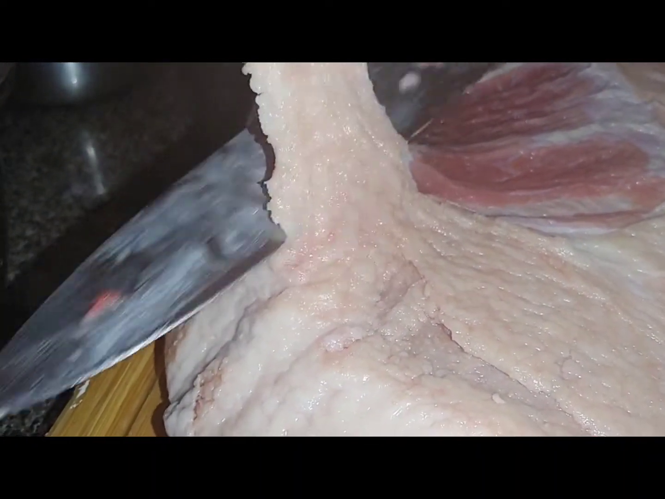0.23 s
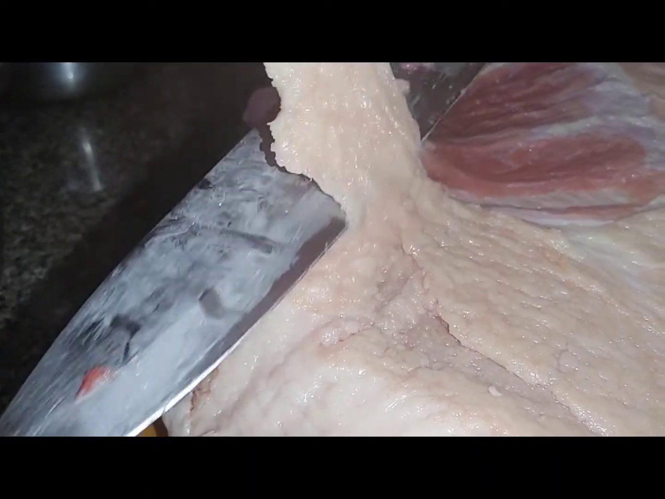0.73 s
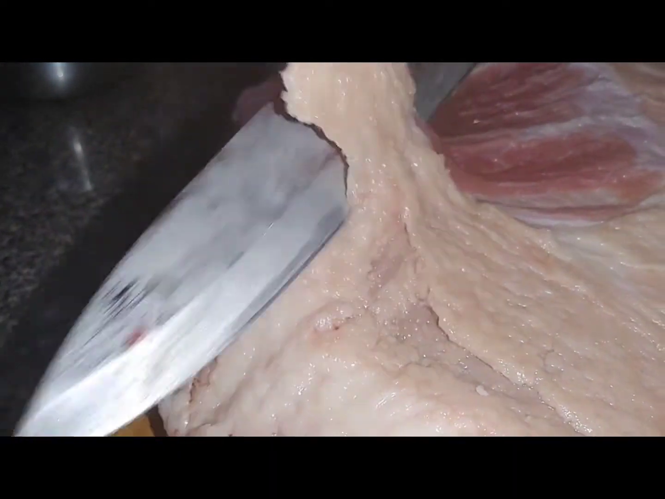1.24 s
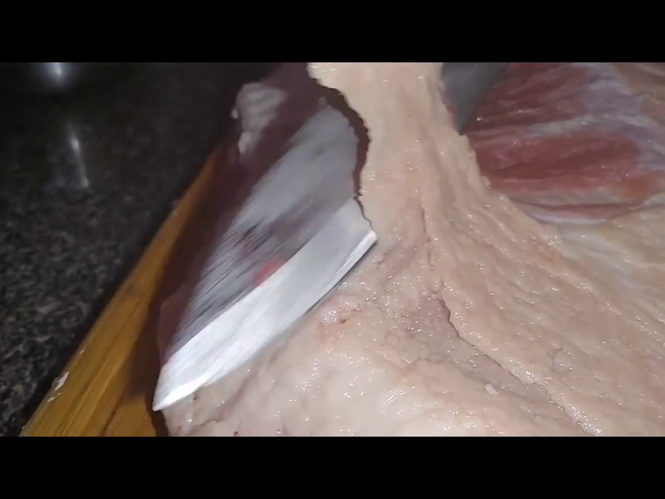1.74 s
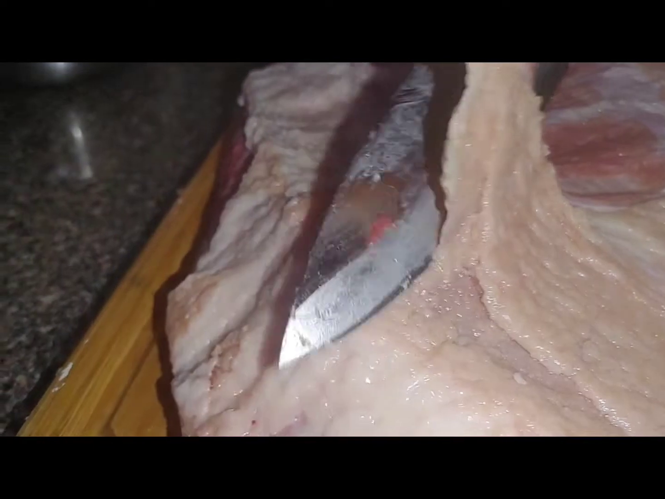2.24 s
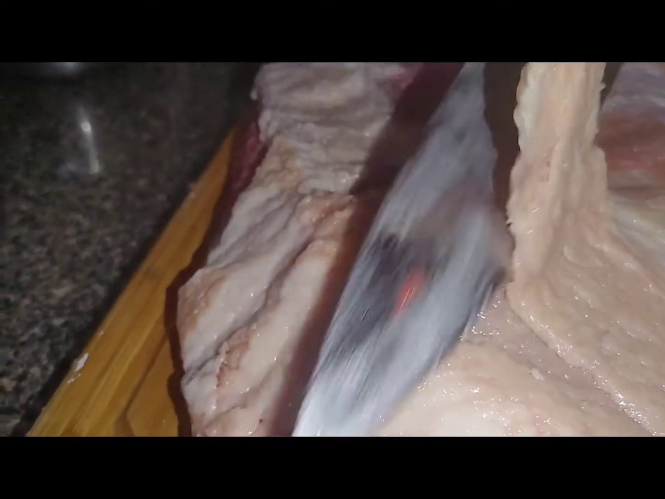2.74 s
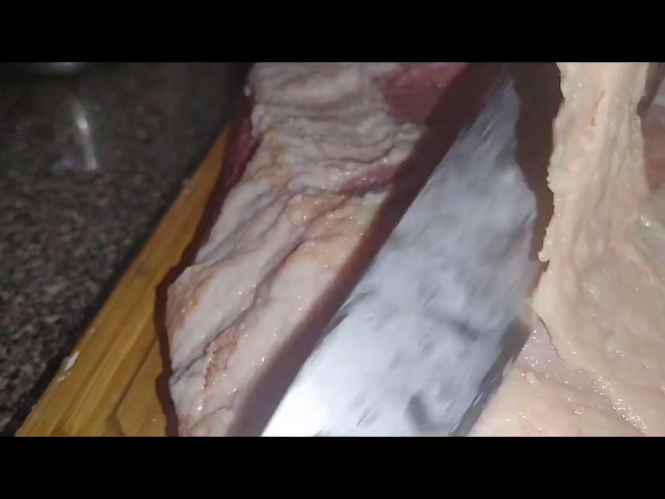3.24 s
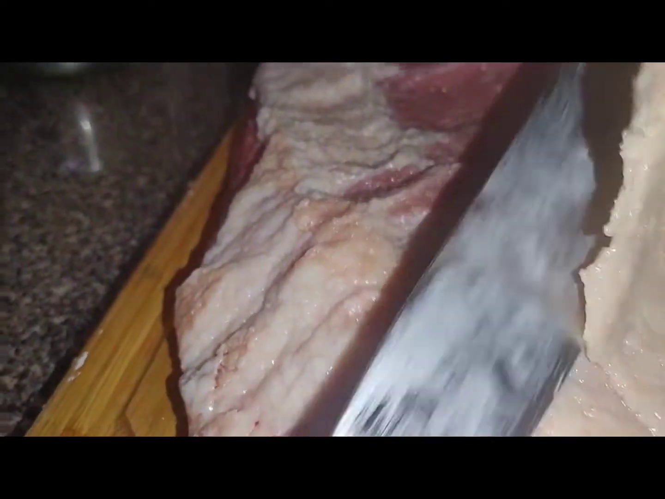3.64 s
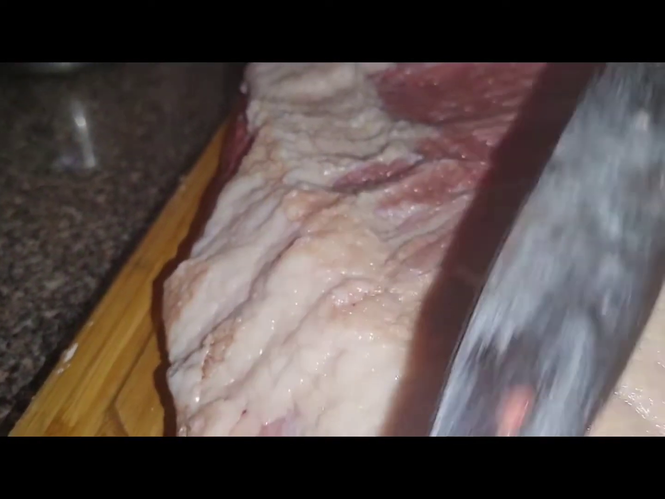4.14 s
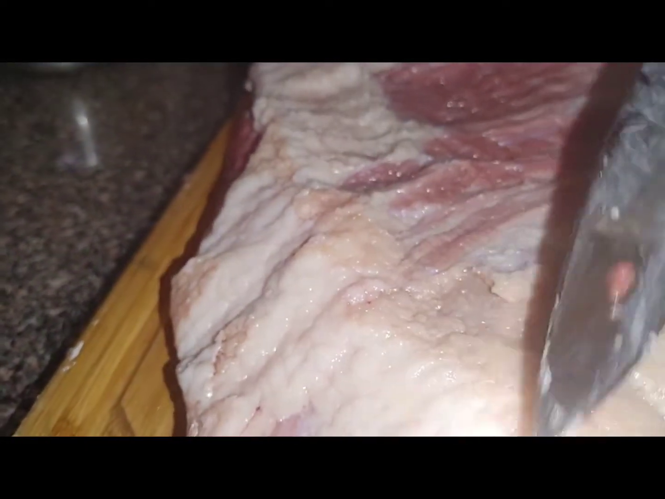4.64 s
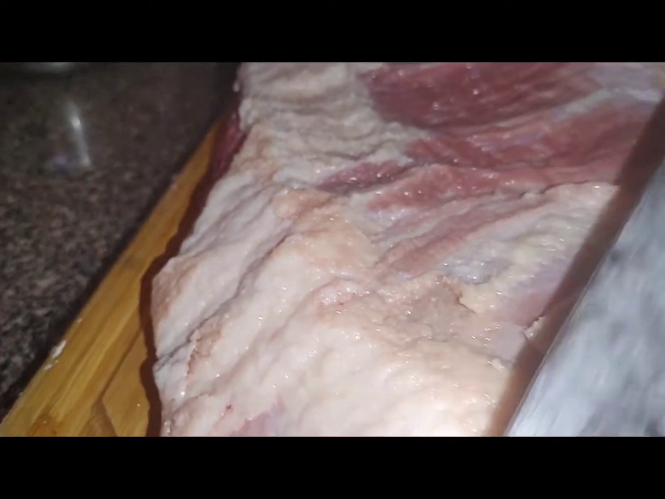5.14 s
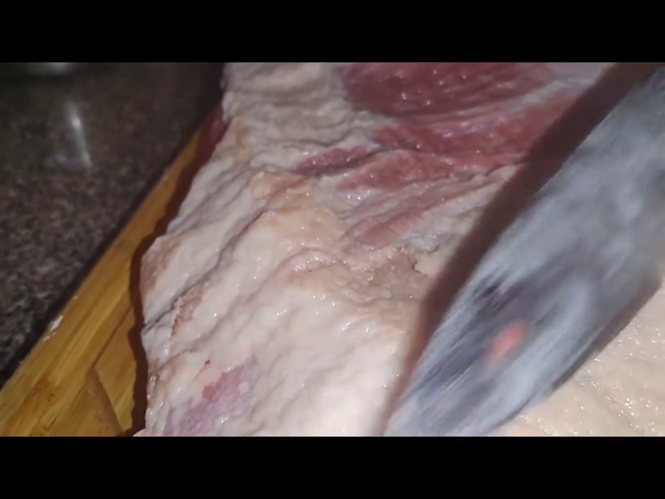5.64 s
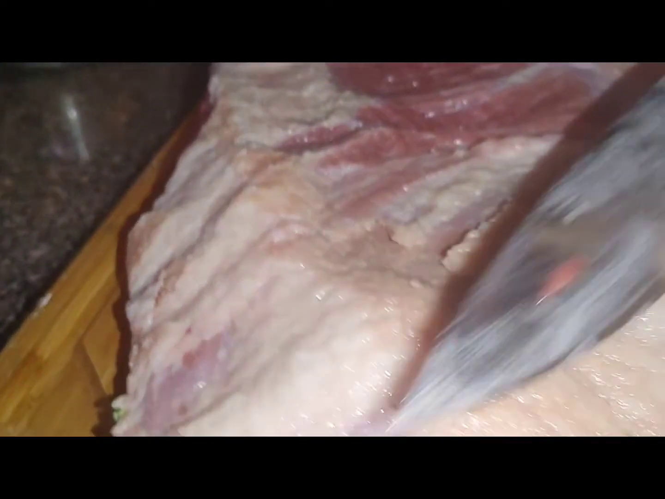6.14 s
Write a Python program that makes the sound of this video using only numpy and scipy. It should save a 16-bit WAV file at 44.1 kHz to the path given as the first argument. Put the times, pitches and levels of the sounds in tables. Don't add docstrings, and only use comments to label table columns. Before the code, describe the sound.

Close, quick to-and-fro knife sawing through cold fat, bright metallic hiss about five strokes a second, small blade knocks and scuffs, faint fridge hum.

```python
import sys
import numpy as np
from scipy import signal
from scipy.fft import rfft, irfft
from scipy.io import wavfile
from scipy.ndimage import uniform_filter1d

SR = 44100
rng = np.random.default_rng(int(sys.argv[2]) if len(sys.argv) > 2 else 0)


def boost_factor(decibels):
    exponent = np.asarray(decibels, float) / 20
    return 10 ** exponent


def waveform_to_disk(signal):
    frames = np.transpose(np.atleast_2d(signal))
    scaled = np.clip(frames, -1, 1) * 32767
    samples = np.round(scaled).astype(np.int16)
    wavfile.write(sys.argv[1], SR, samples)


N = 281799

BLADE_MODES_HZ = [1530, 2345, 2760, 3590, 4250, 4820, 5500, 6558, 7120, 7552, 8200, 8495, 9395, 10150,
                  10330, 10960, 11310, 11950, 13000, 14020, 14500, 15100]


def rms_one(x):
    return x / np.sqrt(np.mean(x ** 2) + 1e-20)


def at_hz(points, hz):
    points_hz, values = np.transpose(points)
    return np.interp(np.log(hz), np.log(points_hz), values)


def drift(rate_hz):
    r = np.exp(-80 * np.pi * rate_hz / SR)
    noise = rng.standard_normal(N // 40 + 2002)
    slow = signal.lfilter([1], [1, -2 * r, r * r], noise)[2000:]
    return np.interp(np.arange(N) / 40, np.arange(len(slow)), rms_one(slow))


def resonate(x, hz, width_hz):
    r = np.exp(-np.pi * width_hz / SR)
    poles = [1, -2 * r * np.cos(2 * np.pi * hz / SR), r * r]
    return signal.lfilter([(1 - r * r) / 2, 0, (r * r - 1) / 2], poles, x)


def pair(one, other, alike):
    alike = np.clip(alike, 0, 1)
    return np.sqrt(1 + alike) * one + np.sqrt(1 - alike) * other * [[1], [-1]]


def sides(lean_db):
    return boost_factor(lean_db * np.array([[.5], [-.5]]))


def room_tone():
    # (frequency [Hz], density [dB per Hz])
    floor_spectrum = [(12, -56), (20, -37), (122, -6.5), (196, 0.5), (362, -0.5), (465, -11.5), (614, -8.5),
                      (1820, -22), (2760, -21.5), (3360, -23), (4960, -31.5), (5860, -32), (8410, -48),
                      (11700, -52), (15500, -65)]
    # (frequency [Hz], left-right likeness [0-1])
    likeness = [(40, 0.19), (300, 1), (600, 0.31), (1500, 0.04), (6000, .05)]
    hz = np.arange(N // 2 + 1) * SR / N + 1
    one, other = rfft(rng.standard_normal((2, N))) * boost_factor(at_hz(floor_spectrum, hz))
    return boost_factor(-65) * rms_one(irfft(pair(one, other, at_hz(likeness, hz)), N))


def motor():
    # (frequency [Hz], width [Hz], rms level [dB], steady power share [0-1])
    hum_lines = [(53, 5.2, -84, 0.34), (75, 20, -83.5, 0.061), (185.3, 13, -71, 0.26),
                 (199.4, 4.6, -63, 0.65), (250.7, 12.5, -73, 0.19), (293, 19, -72, 0.037),
                 (399.4, 4.4, -79, 0.086), (441, 15, -82, 0.034), (473, 23.5, -80, 0.084),
                 (743, 12, -89.5, 0.17)]
    out, t = 0, np.arange(N) / SR
    for hz, width_hz, db, steady in hum_lines:
        sine = np.sin(2 * np.pi * hz * t + 6 * rng.random())
        waver = rms_one(resonate(rng.standard_normal(N), hz, width_hz))
        out = out + boost_factor(db) * (np.sqrt(2 * steady) * sine + np.sqrt(1 - steady) * waver)
    return boost_factor(3.5) * out


def kitchen(x, t60_s=0.28, wet_db=-20, dull_t60_s=0.33, dull_db=-3, dull_hz=5000):
    t = np.arange(int(.4 * SR)) / SR
    bright, dull = rng.standard_normal((2, 2, len(t))) * (t > .004)
    dull = signal.sosfilt(signal.butter(2, dull_hz, fs=SR, output="sos"), dull)
    tail = bright * boost_factor(-60 * t / t60_s) + dull * boost_factor(dull_db - 60 * t / dull_t60_s)
    tail = tail / np.sqrt(np.sum(tail ** 2) / 2)
    return boost_factor(wet_db) * signal.fftconvolve(x, tail, axes=1)[:, :N]


def taps():
    # (time [s], peak level [dB], ring [Hz], thump [dB])
    knocks = [
        (1.684, -53.5, 1425, -2),
        (3.445, -47.5, 1160, -0.5),
        (3.697, -46, 1530, -8),
        (4.052, -56.5, 1700, 2),
        (5.932, -51.5, 1560, -22),
    ]
    out, t = np.zeros(N), np.arange(2000) / SR
    swell = np.exp(-t / .005) * (1 - np.exp(-t / .0015)) * 1.9
    for s, db, hz, thump_db in knocks:
        thump = resonate(rng.standard_normal(len(t)), 490, 640) * np.exp(-t / 0.025)
        ring = np.sin(2 * np.pi * hz * t * (0.924 + 6.2 * t)) * swell
        i = round(s * SR)
        out[i:i + len(t)] += boost_factor(db) * (ring + boost_factor(thump_db + 6.5) * thump)
    return out * boost_factor(np.array([[-5], [4]]))


def catches():
    # (start [s], length [s], ring near 4 kHz [dB], ring near 2 kHz [dB])
    scuffs = [
        (4.809, 0.018, -48.5, -60),
        (4.983, 0.035, -50.5, -56),
        (5.556, 0.022, -45.5, -81),
        (5.703, 0.068, -49, -50.5),
        (5.752, 0.019, -39.5, -61),
        (5.876, 0.0043, -50.5, -74),
        (1.154, 0.01, -54.5, -70),
        (4.633, 0.019, -56, -74),
    ]
    out = np.zeros((2, N))
    for s, length_s, high_db, low_db in scuffs:
        t = np.arange(int(length_s * SR) + 1500) / SR
        swell = np.sqrt(np.sin(np.pi * np.minimum(t / length_s, 1)) + 1e-12)
        scuff = rng.standard_normal((2, len(t))) * swell
        high = boost_factor(high_db + 16) * resonate(scuff, BLADE_MODES_HZ[4], 230)
        low = boost_factor(low_db + 14) * resonate(scuff, BLADE_MODES_HZ[1], 115)
        i = round(s * SR)
        out[:, i:i + len(t)] += high + low
    return out * sides(-6)


def hand():
    # (start [s], length [s], rub level [dB], swell over the stroke [dB], pressing [dB])
    pushes = [(0.206, .23, -45, 4.5, -4), (0.66, .23, -43.5, 1.5, -3.5), (1.107, .18, -50, 8, .5),
              (1.538, .21, -45.5, -3.5, -1.5), (1.959, .21, -44, -4, -0.5), (2.392, 0.21, -43, 5, -1.5),
              (2.799, .21, -42.5, 5, -2), (3.208, .21, -44, -6.5, 0.2), (3.614, .22, -39.5, 8, -0.3),
              (4.012, 0.23, -43.5, -5, -0.1), (4.423, .18, -53, 5, -1), (4.784, .2, -42.5, 3.5, 0),
              (5.133, .22, -40.5, 9, 1), (5.523, 0.19, -44.5, -0.5, 4.5), (5.87, .2, -45, 3.5, 4),
              (6.234, .19, -39, -5.5, 2.5)]
    pulls = [(-0.02, 0.23, -51.5, -14.5, -4.0), (0.463, 0.17, -46, -1.5, -6.5), (0.909, 0.18, -50, 0, -4),
             (1.326, 0.21, -49.0, 10.5, -1.7), (1.761, 0.22, -45, -11.5, -5.0),
             (2.178, 0.21, -46.5, -13.5, -4.5), (2.59, 0.22, -46, 1.5, -4.5), (3.016, 0.21, -50, -11.5, 3),
             (3.395, 0.23, -44.5, 14, -1.7), (3.817, 0.21, -45.5, 7.5, -2.5),
             (4.233, 0.27, -69.5, -63, -1.6), (4.602, 0.18, -44.5, 21.5, 1), (4.979, 0.18, -41.5, 4.5, 0.5),
             (5.349, 0.19, -45.5, -21, -4), (5.703, 0.18, -49, 12, 5), (6.066, 0.17, -42, 14, 1.5)]
    # (time [s], middle over low rub [dB], left over right [dB])
    places = [(0, -3.5, 9.5), (.8, -1, 5), (1.5, 0.5, 3.5), (2.4, 0, 3.5), (3.2, -1, 6), (3.9, -0.5, 4.5),
              (4.501, 4, 3), (5.4, 1, 3), (5.8, 2.5, 6), (6.39, -0.6, 2.5)]
    # low rub [dB], middle rub [dB], left over right [dB]
    push_slide_db, pull_slide_db = (0.83, 0.26, -3), (-1.1, -2.4, 0.49)
    attack_s, release_s, ease_power = 0.034, 0.039, 4.97
    bite_db, bite_at_s, bite_s = 2, 0.036, 0.0099

    t, level, marks = np.arange(N) / SR, np.full(N, 1e-6), []
    for strokes, slide_db in ((pushes, push_slide_db), (pulls, pull_slide_db)):
        for s, length_s, db, swell_db, press_db in strokes:
            i = slice(max(round(s * SR), 0), round((s + length_s) * SR))
            u = np.clip((t[i] - s) / length_s, 0, 1)
            bite = bite_db * np.exp(-((u * length_s - bite_at_s) / bite_s) ** 2)
            speed = np.tanh(u * length_s / attack_s) * np.tanh((1 - u) * length_s / release_s)
            level[i] += boost_factor(db - 3.5 + swell_db * (u - .5) + bite) * speed ** ease_power
            for end in (-1, 1):
                mark_s = s + length_s * (.5 + end * .3)
                marks.append((mark_s, press_db, db, *np.multiply(slide_db, end / 2)))
    mark_s, *columns = np.transpose(sorted(marks))
    press, effort_db, low, mid, lean_db = (np.interp(t, mark_s, c) for c in columns)
    place_s, *columns = np.transpose(places)
    tilt, place_lean_db = (np.interp(t, place_s, c) for c in columns)

    low_db = -9.5 + 1.44 * press + low - tilt
    mid_db = -9.5 + 0.74 * press + mid + tilt
    air_db = -1.1 + 0.18 * (effort_db + 41.5)
    smooth_level = uniform_filter1d(level, int(0.0017 * SR))
    return smooth_level, (low_db, mid_db, air_db), place_lean_db + lean_db


def weight_db(hz, shares_db, low_hz=3200, mid_hz=6800, air_hz=10000):
    low_db, mid_db, air_db = shares_db
    low = 1 / (1 + (hz / low_hz) ** 8)
    below = 1 / (1 + (hz / mid_hz) ** 10)
    air = 1 / (1 + (air_hz / hz) ** 8)
    return low * (low_db + 13) + (below - low) * (mid_db + 7.5) + air * air_db


def grit(spread_db, per_s=14000):
    sizes = boost_factor(spread_db * np.minimum(rng.exponential(1, (2, N)), 5))
    signs = rng.choice([-1, 1], (2, N))
    return rms_one(sizes * signs * (rng.random((2, N)) < per_s / SR))


def rub(level, shares_db):
    # (frequency [Hz], density [dB per Hz])
    hiss_spectrum = [(470, -47), (800, -17), (1310, -8.5), (1540, -20.5), (1880, -13.5), (2770, -4),
                     (3420, -5), (4220, 5.5), (5820, -3.5), (8350, 2.5), (8990, -4), (11200, -7.5),
                     (15500, -55)]
    # (frequency [Hz], left over right [dB])
    hiss_lean = [(60, 2.0), (92, 1.0), (140, -1.0), (210, -0.5), (330, -0.5), (500, 1.0), (770, 7),
                 (1170, -1.5), (1790, -21.5), (2740, 4.5), (4190, -4), (6410, -3), (9810, 25.5),
                 (15000, 27)]
    out, slips = 0, [grit(2.5), grit(2.55)]
    edges_hz = 800 * 2 ** np.arange(0, 4.4, 1 / 3)
    for k, (low_hz, high_hz) in enumerate(zip(edges_hz, edges_hz[1:])):
        hz = np.sqrt(low_hz * high_hz)
        band = signal.butter(2, [low_hz, high_hz], "band", fs=SR, output="sos")
        one, other = signal.sosfilt(band, slips[k % 2])
        patchy_db = 1.47 * drift(3.0) + 2.94 * drift(29)
        gain = boost_factor(at_hz(hiss_spectrum, hz) + weight_db(hz, shares_db) + patchy_db)
        out = out + gain * pair(one, other, 0.66) * sides(at_hz(hiss_lean, hz))
    return level * rms_one(out)


def blade(level, shares_db):
    # (width [Hz], level [dB], left over right [dB])
    modes = [(130, -21, -16.5), (64.4, -15.5, -20), (190, -6.5, -10), (83, -3.5, -3), (104, -2.5, -9.5),
             (75.6, -3, 2), (110, -12.5, 21), (61.6, -3, 14.5), (93, -9.5, 22), (39.2, -0.5, 15),
             (108, -3, 16.5), (71, 5.5, 1.5), (55.556, 4.5, 0), (111, -7, -5), (60.5, 6, 9),
             (240, 1.5, 11.5), (138, 7.5, 6), (168, -2, 17), (75.6, -20, 20), (218, -13.5, 24),
             (81, -34, 4), (217, -18, 29)]
    out, (one, other) = 0, grit(3.4)
    slips = pair(one, other, .3)
    for k, (hz, (width_hz, db, lean_db)) in enumerate(zip(BLADE_MODES_HZ, modes)):
        drive = level * boost_factor(db + weight_db(hz, shares_db) + 3.35 * drift(4.03)) / np.sqrt(width_hz)
        own_slips = np.roll(slips, k * 911, axis=1)
        out = out + resonate(own_slips * drive + 1e-18, hz, width_hz) * sides(lean_db)
    return boost_factor(27.5) * out


def scene():
    level, shares_db, lean_db = hand()
    slide = sides(0.8 * (lean_db - 5))
    knife = slide * (rub(level, shares_db) + blade(level, shares_db)) + taps() + catches()
    return room_tone() + motor() + kitchen(knife) + knife


def roll_off(x):
    return signal.sosfilt(signal.butter(12, 15510, fs=SR, output="sos"), x)


def record(dry):
    x = dry - 1.26 * resonate(dry, 5205, 190)
    x[1] -= 0.75 * resonate(x[1], 6700, 400)
    x = np.array([np.roll(x[0], -89), np.roll(x[1], 88)])
    x = signal.sosfilt(signal.ellip(10, .5, 60, 15500, fs=SR, output="sos"), x)
    return roll_off(x)


dry = scene()
out = record(dry)
waveform_to_disk(out)
```